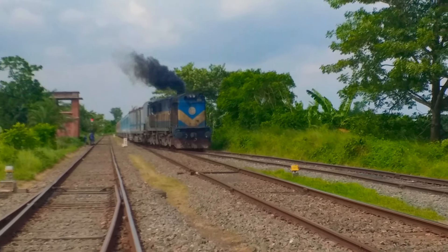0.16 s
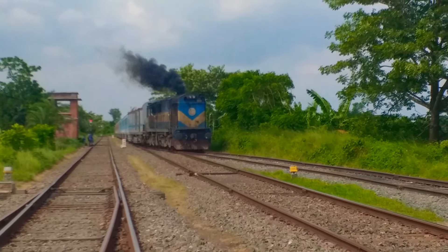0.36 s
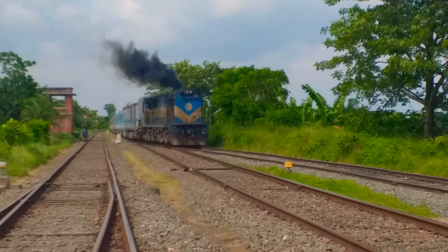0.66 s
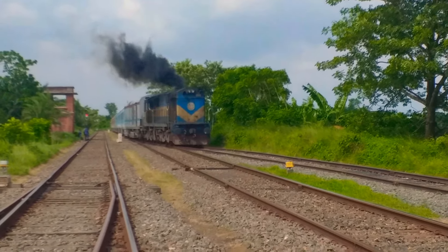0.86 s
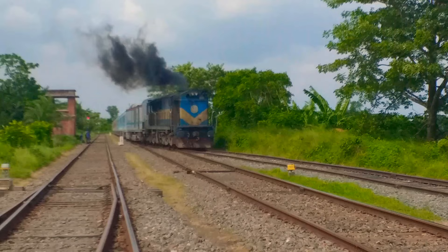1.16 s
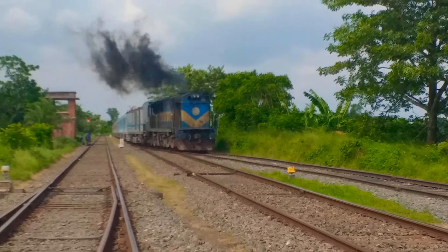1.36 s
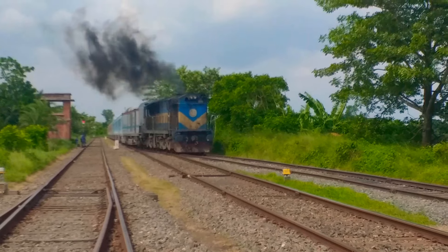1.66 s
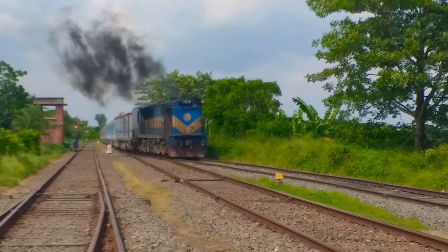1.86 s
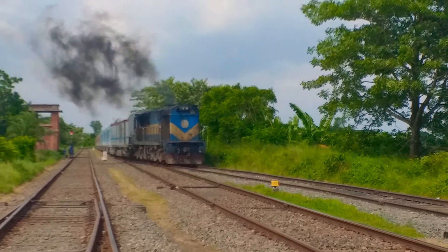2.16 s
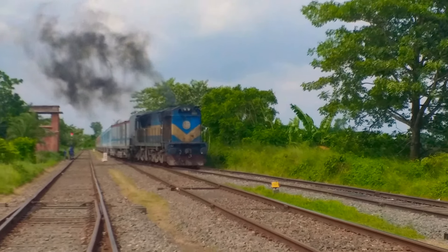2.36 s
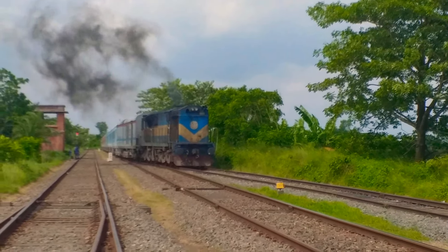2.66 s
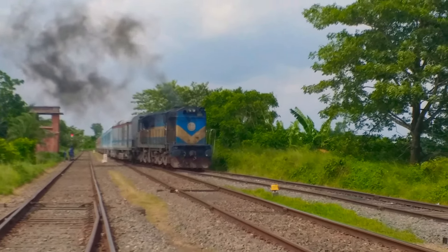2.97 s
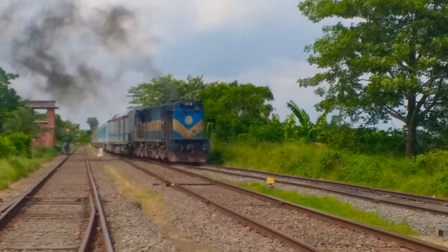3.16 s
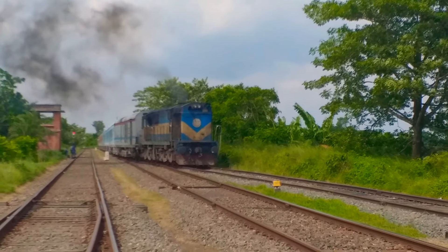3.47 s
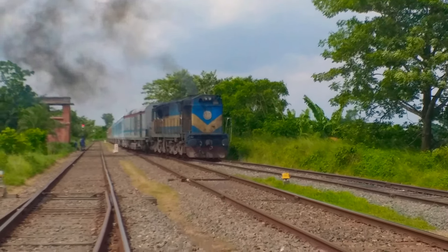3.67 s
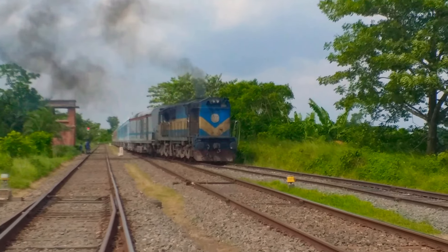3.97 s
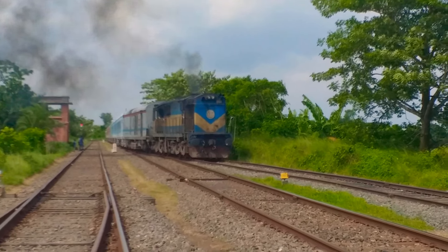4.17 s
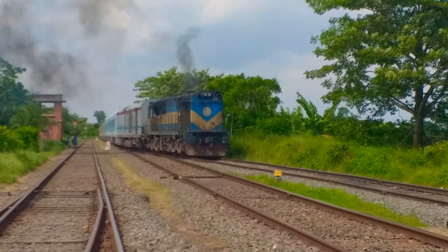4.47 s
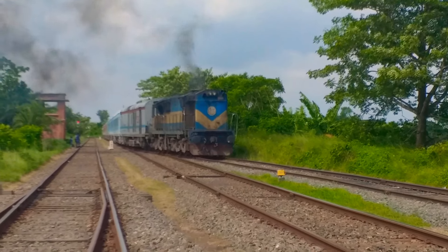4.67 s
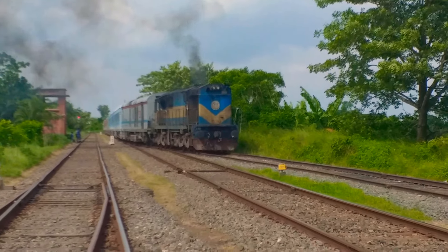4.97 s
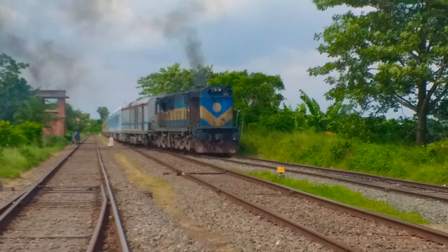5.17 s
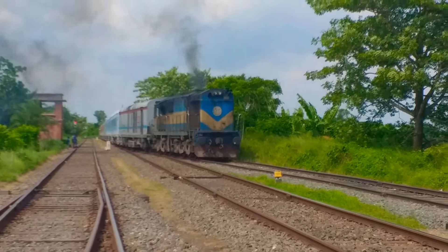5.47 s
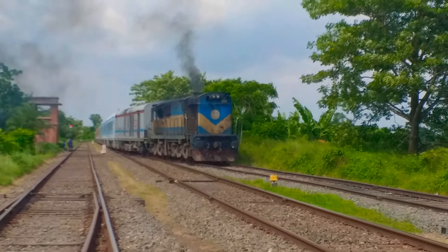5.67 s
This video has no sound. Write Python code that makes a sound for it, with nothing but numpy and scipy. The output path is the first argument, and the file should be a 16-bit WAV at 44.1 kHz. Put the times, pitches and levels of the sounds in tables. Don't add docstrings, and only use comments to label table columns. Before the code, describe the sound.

Gusty wind thumps and snaps at a small microphone while a diesel locomotive hums, hisses and chuffs air steadily across an open yard.

```python
import sys
import numpy as np
from scipy import signal
from scipy.fft import rfft, irfft, next_fast_len
from scipy.io import wavfile
from scipy.ndimage import uniform_filter1d, minimum_filter1d

SR = 44100
rng = np.random.default_rng(int(sys.argv[2]) if len(sys.argv) > 2 else 0)


def voltage_ratio(decibels):
    exponent = np.asarray(decibels, float) / 20
    return 10 ** exponent


def materialize(psi):
    bounded = np.clip(np.atleast_2d(psi).T, -1, 1)
    quanta = np.round(bounded * 32767).astype(np.int16)
    wavfile.write(sys.argv[1], SR, quanta)


N = 256662


def evened(x):
    return x / np.sqrt(np.mean(x ** 2) + 1e-20)


def curve(rows):
    s, *columns = np.transpose(rows)
    return [np.interp(np.arange(N) / SR, s, column) for column in columns]


def coloured(x, gain_db):
    size = next_fast_len(len(x))
    hz = np.fft.rfftfreq(size, 1 / SR) + 1
    return irfft(rfft(x, size) * voltage_ratio(gain_db(hz)), size)[:len(x)]


def read(points):
    f, value = np.transpose(points)
    return lambda hz: np.interp(np.log(hz), np.log(f), value)


def hump(hz, centre_hz, width_hz):
    return 1 / (1 + (2 * (hz - centre_hz) / width_hz) ** 2)


def wander(top_hz):
    steps = rng.standard_normal(N // 64 + 2)
    slow = coloured(steps, lambda hz: -10 * np.log10(1 + ((hz - 1) / 64 / top_hz) ** 6))
    return np.interp(np.arange(N) / 64, np.arange(len(slow)), evened(slow))


def add(mix, s, sound):
    part = mix[max(round(s * SR), 0):][:len(sound)]
    part += sound[:len(part)]


def mottled(x, patchy_db=2.5):
    z = signal.stft(x, nperseg=512, noverlap=384)[2]
    patches = rng.standard_normal(z.shape[::-1]).T
    patches = uniform_filter1d(patches, size=3, axis=0)
    patches = evened(uniform_filter1d(patches, size=25, axis=1))
    return signal.istft(z * voltage_ratio(patchy_db * patches), nperseg=512, noverlap=384)[1][:N]


# [start_s, end_s, start_pitch_hz, end_pitch_hz]
WHINES = [
    (.4, 1.02, 2810, 2890),
    (5.3, 5.95, 3040, 3060),
    (1.35, 1.7, 6200, 6200),
    (.64, 1.0, 10620, 10620),
    (.85, 1.75, 10050, 10000),
    (1.2, 1.8, 10760, 10620),
    (.22, .55, 12200, 12200),
    (2.4, 2.62, 10600, 10600),
]
WHINE_LEVELS = [-47, -49, -58, -66, -68, -71, -63, -69]


def whines():
    out = np.zeros(N)
    for (start_s, end_s, start_hz, end_hz), db in zip(WHINES, WHINE_LEVELS):
        a, b = round(start_s * SR), min(round(end_s * SR), N)
        hz = np.linspace(start_hz, end_hz, b - a) + 6 * wander(top_hz=30)[a:b]
        tone = np.sin(2 * np.pi * np.cumsum(hz) / SR) * voltage_ratio(db + 2 * wander(top_hz=12)[a:b])
        fade = signal.windows.tukey(round((end_s - start_s) * SR) + 1, .3)[:b - a]
        out[a:b] += np.sqrt(2) * tone * fade
    return out


# [crest_s, level_db, rise_s, fall_s]; rise and fall are the times to change by 20 dB
GUSTS = [(0.0, -12.5, .05, -0.025), (0.137, -14, 0.16, 0.0144), (0.229, -19.5, 0, 0.19),
         (.52, -20, -0.04, 0), (.58, -26, 0.14, .015), (.655, -18, -0.02, 0.03), (.91, -39.5, 1, 2.2),
         (1.077, -23, -0.05, 0.21), (1.198, -19.5, 0.01, 0.13), (1.32, -15.5, -0.01, 0.2247),
         (1.421, -7, 0, 0.01), (1.483, -17.5, .015, 0.01), (1.829, -16, 0.04, 0.055),
         (2.385, -15, 0.07, .03), (2.582, -16.5, 0.1147, .15), (2.738, -14.5, 0.06, 0.0046),
         (2.83, -27.5, 0.74, 0.14), (3.082, -16, 0.04, 0.16), (3.172, -21, 0.04, -0.08),
         (3.26, -29, 0.1, 0.1), (3.599, -9, 0.0636, 0.104), (3.76, -16.5, .2, 0.33),
         (3.87, -19, 0.04, 0.21), (3.938, -10, 0.104, 0.09), (4.08, -10, .08, 0.11),
         (4.16, -25, -0.7, 0.28), (5.25, -30, 0.12, 0.4), (5.33, -24, 0.14, 0.15),
         (5.399, -20.5, 0.14, 0.11), (5.478, -29, 0, 0.2)]


def gusting():
    calm_db = -46.5
    t, power = np.arange(N) / SR, voltage_ratio(2 * calm_db)
    for s, db, rise_s, fall_s in GUSTS:
        drop = np.maximum((s - t) / max(rise_s, .004), (t - s) / max(fall_s, .004))
        power = power + voltage_ratio(2 * (db - 20 * drop))
    return 10 * np.log10(power)


# [pitch_hz, level_db per Hz]
EDDY_COLOUR = [(15, -58), (28, -37), (62, -0.5), (110, 1.5), (794, -23.5), (1610, -44.5), (2690, -44.5),
               (3920, -82.5), (4580, -56), (5000, -83), (6500, -81), (11000, -120)]


def wind():
    level_db = gusting()
    small_db = -10.5 - np.maximum(-34 - level_db, 0)
    colour, split_hz = read(EDDY_COLOUR), 330

    large = rng.standard_normal(N)
    large = coloured(large, lambda hz: colour(hz) - 10 * np.log10(1 + (hz / split_hz) ** 4))
    large = evened(evened(large) * voltage_ratio(3.46 * wander(top_hz=35.5)))

    happens = rng.random(N) < 420 / SR
    strength = voltage_ratio(2.35 * np.minimum(rng.exponential(1, N), 3)) * rng.choice([-1, 1], N)
    clumps = voltage_ratio(np.minimum(8.0 * wander(top_hz=42.7), 10.5))
    small = coloured(happens * strength * clumps,
                     lambda hz: colour(hz) - 10 * np.log10(1 + (split_hz / hz) ** 4))
    return voltage_ratio(level_db + 5) * large + voltage_ratio(level_db + small_db) * evened(small)


# [snap_s, peak_db, swing_pitch_hz, snap_db]
SLAPS = [(0.082, -24, 94, -11.5), (0.126, -8, 88, -16), (0.186, -2, 135, -13), (0.223, 1, 139, -9.5),
         (0.573, -5.5, 127, -23), (0.633, -16, 174, -23.5), (1.073, 1, 175.4, -16.5), (1.169, -9, 142, -33),
         (5.39, 0.5, 119.5, -8), (1.316, -8, 194, -14), (1.377, 1.5, 148, -9.5), (1.473, -3, 150, -5.5),
         (1.824, -9, 83, -8), (2.377, -1.5, 142, -9), (2.576, 1.5, 66.3, -4), (2.567, -4, 107, -14.5),
         (2.733, -1, 118, -29), (3.076, -14, 122, -9), (3.253, -5.5, 141, -19), (3.499, -7.5, 147, -22.5),
         (3.561, -2.5, 85, -31), (3.846, -12, 90, -8.5), (3.998, 3, 106.5, -20), (4.057, -4, 129, -15),
         (4.226, -8, 117.4, -21), (5.177, -15, 107, -19), (5.319, -7, 159, -22), (5.369, -1.5, 128, -6.5),
         (.512, -6.5, 76, -35), (3.603, -3.5, 86.5, -30)]


def slaps():
    out, t = np.zeros(N), np.arange(5000) / SR
    lead_s, decay_s = .002, 0.013
    draws = rng.standard_normal((len(SLAPS), len(t) + 1))
    for (s, db, pitch_hz, _), (a, *noise) in zip(SLAPS, draws):
        shape = (1 - np.exp(-t / 0.0012)) * np.exp(-t / (decay_s * (120 / pitch_hz) ** 0.38))
        uneven = uniform_filter1d(np.array(noise), size=120) * np.sqrt(120)
        hz = pitch_hz * (1 + 0.79 * np.exp(-t / 0.004) + 0.22 * uneven)
        swing = np.sin(2 * np.pi * np.cumsum(hz) / SR + np.pi + .6 * a)
        add(out, s - lead_s, voltage_ratio(db - 1.5) * shape * swing)
    return out


# [start_s, peak_db, crack_db against the snap]
SNAPS = [(0.199, -16, -12), (0.505, -20, -14.5), (5.11, -30.5, -28), (1.225, -22, -13.5), (1.41, -9, -38),
         (2.364, -11, -30.5), (2.396, -9, -21), (2.541, -30, -27), (2.593, -6.5, -25), (2.633, -13, -19),
         (3.059, -20, -13), (3.161, -13.5, -18), (3.511, -15, -10), (3.546, -13, -16), (3.585, -2.5, -10.5),
         (3.602, -5.5, -16), (3.634, -8.5, -19.5), (3.698, -10.5, -14), (3.728, -12, -15),
         (3.562, -7, -9.5), (3.875, -3, -16), (3.93, -12.5, 1), (3.938, -6.5, -22), (3.993, -13, -4.5),
         (4.074, -8, -14), (4.32, -26.5, -28), (2.733, -6.5, -10.5), (5.241, -22.5, -15),
         (5.334, -12.5, -21), (5.476, -16, -21)]


def snaps():
    out, t = np.zeros(N), np.arange(-100, 600) / SR
    after = np.maximum(t + 0.00088, 0)
    rows = SNAPS + [(s, db, -24) for s, _, _, db in SLAPS]
    draws = rng.standard_normal((len(rows), len(t) + 2))
    wake_band = signal.butter(2, [350, 1200], "band", fs=SR)
    for (s, db, crack_db), (a, b, *noise) in zip(rows, draws):
        hz = (260 + 450 * np.exp(-after / 0.0025)) * (1 + 0.15 * b)
        swell = after / 0.0025 * np.exp(1 - after / 0.0025)
        swing = swell * np.sin(2 * np.pi * np.cumsum(hz) / SR + 3 * a)
        crack = np.exp(.16 - np.hypot(t, .00008) / .0005) * np.cos(2 * np.pi * (800 * t + a))
        ragged = evened(signal.lfilter(*wake_band, noise))
        wake = .45 * ragged * after / .003 * np.exp(1 - after / .003)
        add(out, s + 0.00162 + t[0], voltage_ratio(db - 1.0) * (swing + voltage_ratio(crack_db + 6.5) * (crack + wake)))
    return out


# [pitch_hz, level_db per Hz]
HISS = [(240, -28), (400, -18), (579, -15), (964, -2), (1330, -9.5), (1680, -5.5), (2150, -7), (2800, -2),
        (3470, -8.5), (3870, -13), (4650, -8), (6850, -6.5), (8900, -29.5), (10500, -23.5), (16000, -27.5)]
# [pitch_hz, width_hz, boost_db]
BODY = [
    (830, 330, 7),
    (1700, 310, 6.5),
    (2750, 1600, 1),
    (3450, 450, 6),
    (4336, 1070, 10.5),
    (6120, 820, 2),
    (10400, 900, 0.5),
    (12200, 1200, 2),
]


def train_colour(hz):
    return read(HISS)(hz) + sum(db * hump(hz, f, width_hz) for f, width_hz, db in BODY)


def split(x, edge_hz=8700):
    low = coloured(x, lambda hz: -10 * np.log10(1 + (hz / edge_hz) ** 24))
    return low, x - low


# [time_s, level_db]
ROLL = [(0.0, -34), (0.84, -35), (1.2, -37.5), (1.83, -40), (2.3, -39.5), (2.63, -37), (3.42, -38),
        (3.85, -40.5), (4.15, -40), (4.47, -40.5), (4.9, -41.5), (5.11, -43.5), (5.41, -38.5), (5.74, -37),
        (5.82, -37)]
FIRING_HZ = 75.8


def rolling():
    level_db, = curve(ROLL)
    top_db = -59.5 + 0.76 * (level_db + 39)
    firing = np.cos(2 * np.pi * FIRING_HZ * np.arange(N) / SR)
    flicker = voltage_ratio(0.86 * wander(top_hz=40) + 0.83 * firing)
    noise = rng.standard_normal(N) * flicker
    low, _ = split(coloured(mottled(noise), train_colour))
    _, top = split(coloured(mottled(noise, patchy_db=1.0), train_colour))
    return voltage_ratio(level_db - 2.5) * evened(low) + voltage_ratio(top_db + 0.6) * evened(top)


# [time_s, firing_level_db]
EXHAUST = [(0, -38), (.42, -30.5), (.8, -36), (1.0, -32), (1.6, -33), (2.25, -34), (2.9, -31.5),
           (3.4, -33.5), (4.4, -41.5), (4.65, -34.5), (4.9, -37.5), (4.99, -48), (5.08, -39.5), (5.55, -38),
           (5.7, -26), (5.82, -28.5)]
# [pitch_hz, level_db per Hz]
RUMBLE = [(18, -34), (30, -13), (54, 10), (81, 7.5), (162, 4.5), (211, -26), (309, -14.5), (447, -38),
          (700, -9), (910, -21), (1540, -120)]


def exhaust():
    db, = curve(EXHAUST)
    turns = np.cumsum(FIRING_HZ * (1 + .012 * wander(top_hz=6))) / SR
    first = voltage_ratio(db + 2 * wander(top_hz=12)) * np.sin(2 * np.pi * turns)
    octave_level = voltage_ratio(db - 5.5 + 4.2 * wander(top_hz=16))
    octave = octave_level * np.sin(4 * np.pi * turns + 0.57 * wander(top_hz=23))
    rumble = evened(coloured(rng.standard_normal(N), read(RUMBLE)))
    rumble_db = -38.5 + 0.42 * (db + 36)
    return np.sqrt(2) * (first + octave) + voltage_ratio(rumble_db) * rumble


def yard_echo(x):
    t60_s = 0.37
    t = np.arange(SR // 2) / SR
    tail = rng.standard_normal(len(t)) * voltage_ratio(-60 * t / t60_s) * np.clip(t / 0.017, 0, 1)
    return coloured(signal.fftconvolve(x, tail / np.linalg.norm(tail))[:N], lambda hz: -hz / 2500)


# [start_s, peak_db, loudest_pitch_hz, valve_tick_db]; the tick comes just ahead
CHUFFS = [(0.1219, -18, 2550, -46), (0.35, -19.5, 4800, -39), (0.548, -20, 4450, -43),
          (0.7555, -20.5, 1820, -30), (0.959, -17, 4500, -26), (1.169, -17, 3240, -43.5),
          (1.3789, -17, 1900, -45), (1.587, -15, 4400, -45), (1.8021, -17, 4570, -49.5),
          (2.0206, -20, 4570, -40), (2.239, -17.5, 2690, -35), (2.4544, -18, 2540, -27),
          (2.6766, -17, 2620, -40.5), (2.893, -19, 2750, -27), (3.1108, -18, 4100, -36),
          (3.3279, -20.5, 1700, -44.5), (3.5444, -21.5, 2500, -38), (3.761, -17, 2630, -28),
          (3.9824, -14.5, 2700, -45), (4.198, -19.5, 3020, -27.5), (4.42, -23.5, 5000, -30),
          (4.636, -21, 4730, -47.5), (4.855, -25.5, 2590, -32.5), (5.073, -26.5, 3000, -33),
          (5.2943, -22, 4100, -32), (5.5127, -21, 4430, -29.5), (5.73, -22, 3000, -48)]
# [start_s, peak_db, loudest_pitch_hz]
STRAY_PUFFS = [(0.134, -18, 1500), (0.256, -26, 4500), (0.3341, -20.5, 1580), (0.559, -20.5, 4540),
               (0.7641, -16, 1730), (0.978, -20, 4570), (1.237, -27.5, 3140), (1.444, -26, 2470),
               (2.1025, -26.5, 2410), (2.252, -39, 2700), (2.468, -23.5, 2500), (2.728, -28, 1840),
               (2.9, -30, 2660), (2.969, -34, 2910), (3.349, -31, 2490), (3.775, -21, 4450),
               (3.7933, -23, 1850), (3.937, -31, 1560), (3.962, -30, 4260), (4.003, -40, 2620),
               (4.273, -30.5, 2620), (5.087, -25.5, 3000), (5.379, -30, 1650), (5.525, -28, 4400),
               (5.747, -23.5, 3040)]


def chuffs():
    out, t = np.zeros(N), np.arange(2600) / SR
    # start_s, peak_db, loudest_hz, top_octave_db, length_s
    puffs = [(s, db, hz, -19.5, 0.015) for s, db, hz, _ in CHUFFS]
    puffs += [(s - 0.034, tick_db, 2310, -23, 0.016) for s, _, _, tick_db in CHUFFS]
    puffs += [(s, db, hz, -23, 0.013) for s, db, hz in STRAY_PUFFS]
    spit = voltage_ratio(3 * wander(top_hz=250))
    draws = rng.standard_normal((len(puffs), len(t)))
    for (s, db, loud_hz, top_db, length_s), noise in zip(puffs, draws):
        u = (t - .014) / np.clip(length_s * 0.44, .002, .008)
        swell = np.exp(1 - np.sqrt(1 + (u * np.where(u < 0, 1.7, 1)) ** 2))
        fizz = np.exp(1 - np.sqrt(1 + (u * np.where(u < 0, 3.2, .7)) ** 2))
        low, top = split(coloured(noise, lambda hz: train_colour(hz) + 8 * hump(hz, loud_hz, 340)))
        burst = swell * evened(low) + voltage_ratio(top_db + 3.5) * fizz * evened(top)
        add(out, s - .01, voltage_ratio(db - 10.0) * burst)
    return mottled(out * spit) + voltage_ratio(-5) * mottled(yard_echo(out))


def scene():
    air = wind() + slaps() + snaps()
    train = whines() + rolling() + exhaust() + chuffs()
    return (air + train)[None]


def top_cut(x):
    return signal.sosfilt(signal.butter(12, 15830, fs=SR, output="sos"), x)


def record(dry):
    x = signal.sosfilt(signal.butter(5, 50, "high", fs=SR, output="sos"), dry)
    room = minimum_filter1d(np.minimum(.98 / (abs(x) + 1e-9), 1), size=161)
    x = x * uniform_filter1d(room, size=161)
    treble_limit = signal.firwin(401, 15850, window=("kaiser", 9), fs=SR)
    x = signal.oaconvolve(x, treble_limit[None], "same")
    return top_cut(x)


dry = scene()
out = record(dry)
materialize(out)
```